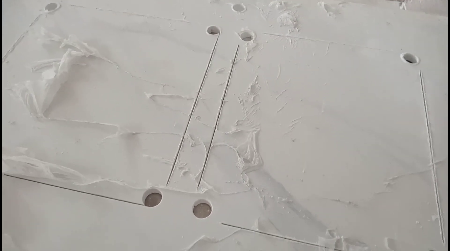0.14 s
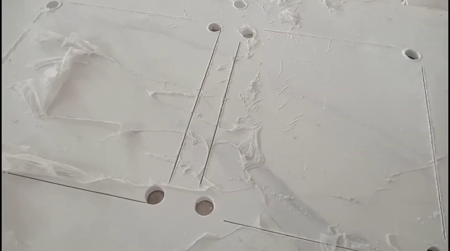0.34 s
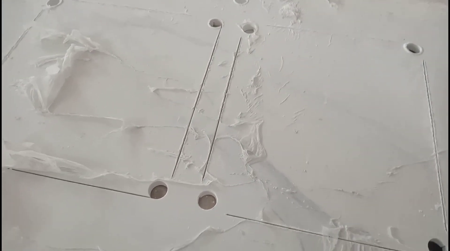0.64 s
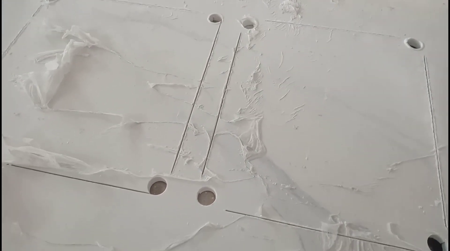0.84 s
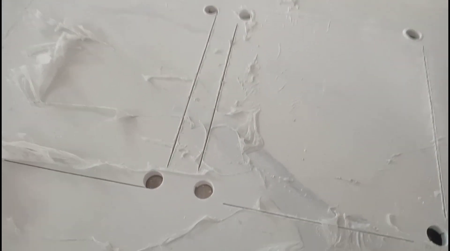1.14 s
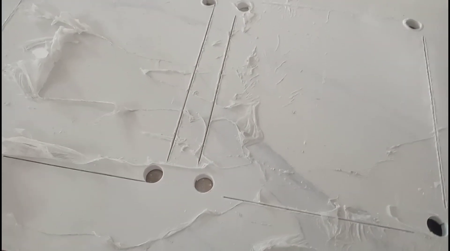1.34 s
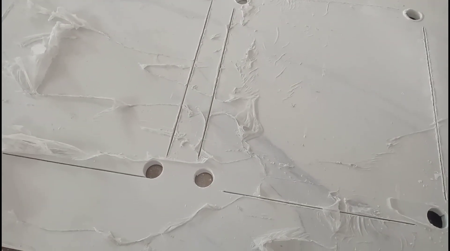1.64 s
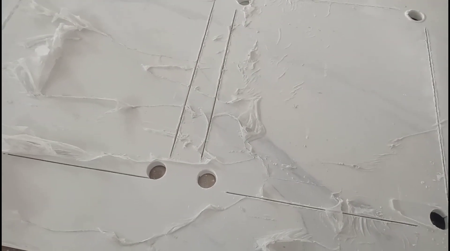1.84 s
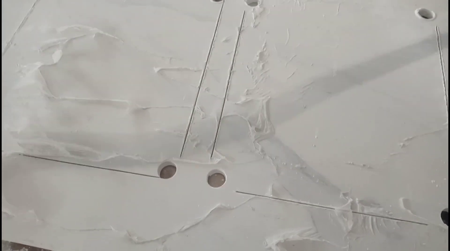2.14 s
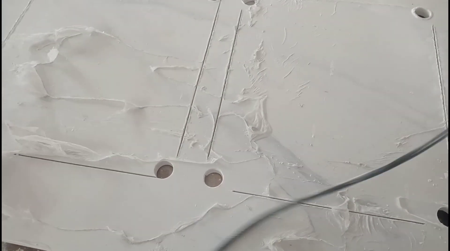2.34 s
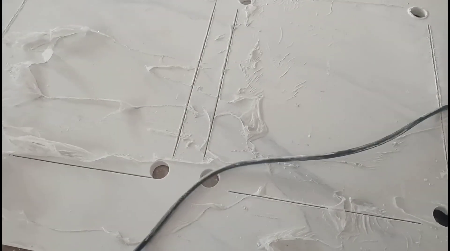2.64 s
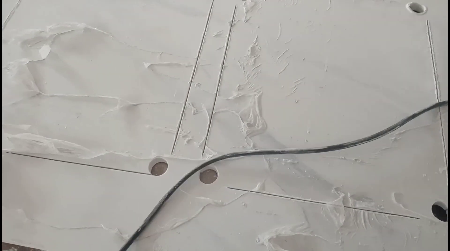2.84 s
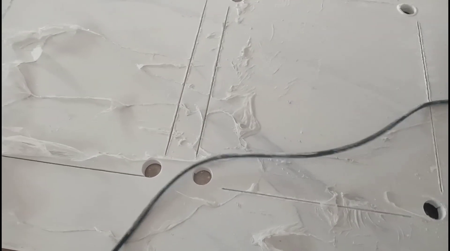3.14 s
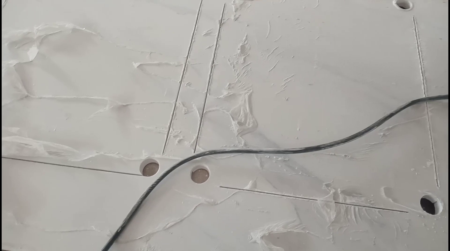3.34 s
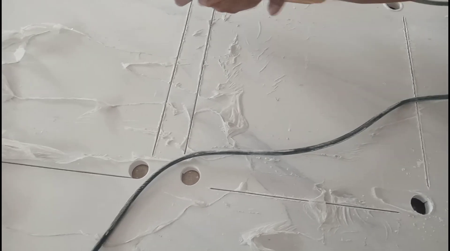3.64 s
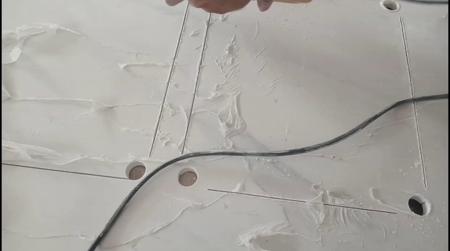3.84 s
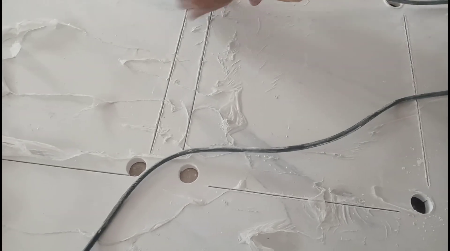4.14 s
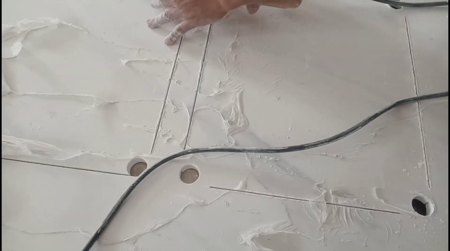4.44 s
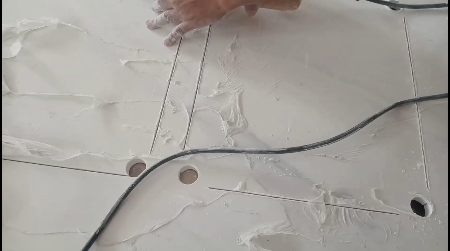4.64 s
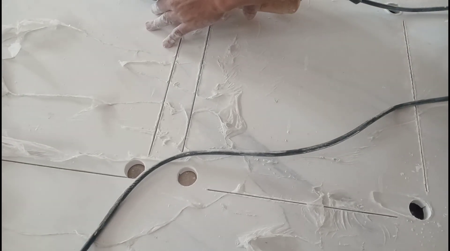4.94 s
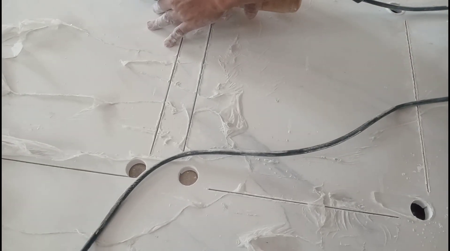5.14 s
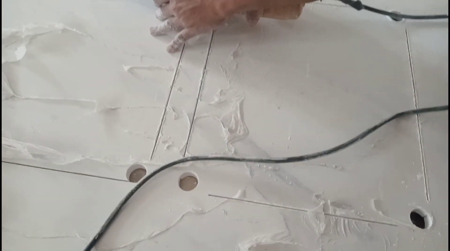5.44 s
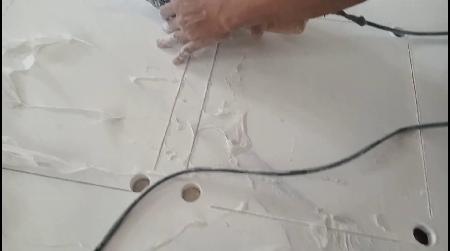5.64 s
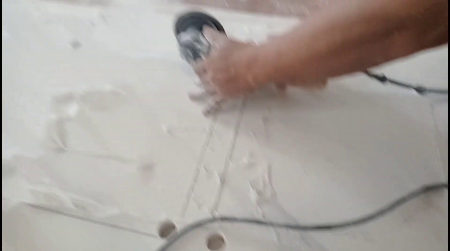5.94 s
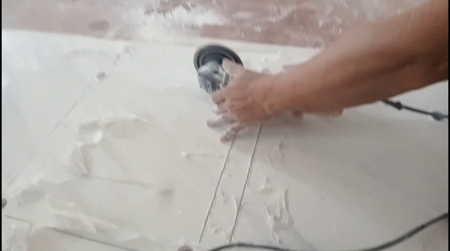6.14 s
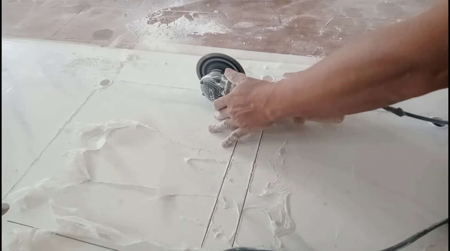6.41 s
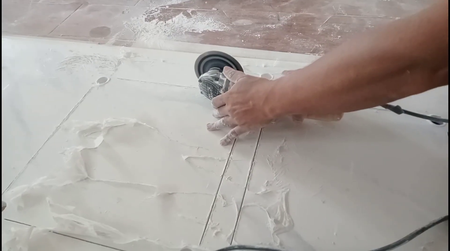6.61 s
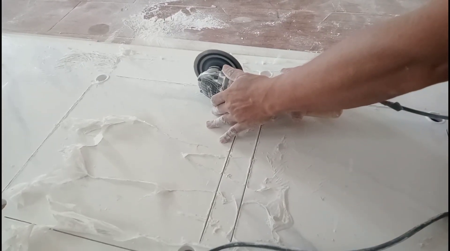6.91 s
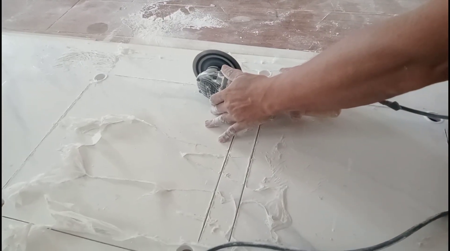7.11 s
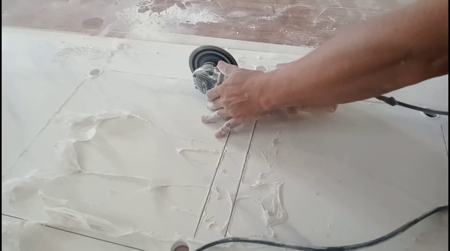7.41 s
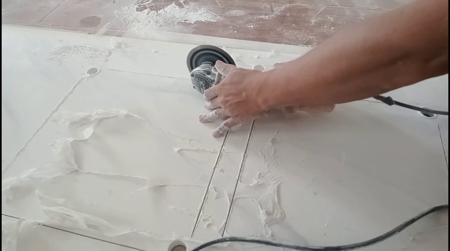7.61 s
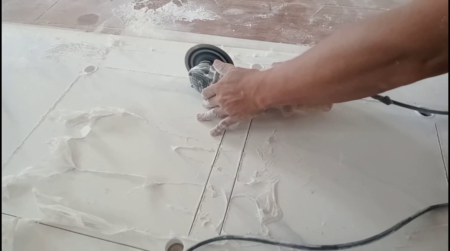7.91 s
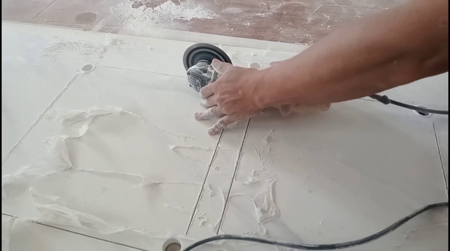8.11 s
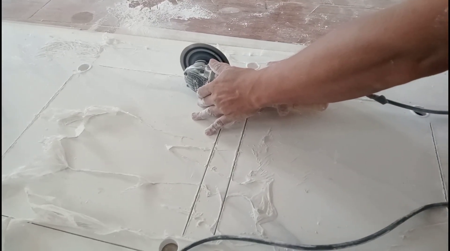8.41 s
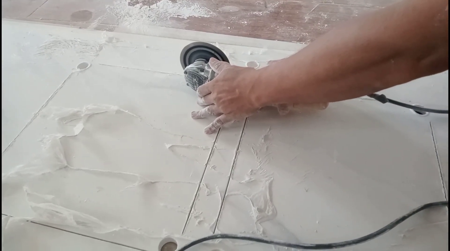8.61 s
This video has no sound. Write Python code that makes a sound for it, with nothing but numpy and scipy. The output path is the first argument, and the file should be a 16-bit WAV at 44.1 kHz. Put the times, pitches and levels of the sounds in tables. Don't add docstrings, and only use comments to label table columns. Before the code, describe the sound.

A handheld grinder coasts down with clattering gears and a falling whine, a cable slaps stone, then it clacks on, roars up and cuts the slab.

```python
import sys
import numpy as np
from scipy import signal
from scipy.fft import rfft, irfft, next_fast_len
from scipy.io import wavfile

SR = 44100
rng = np.random.default_rng(int(sys.argv[2]) if len(sys.argv) > 2 else 0)


def rack_gain(trim_db):
    fader = np.asarray(trim_db, float)
    return 10 ** (fader / 20)


def log_audio(samples):
    frames = np.atleast_2d(samples).T
    limited = np.clip(frames, -1, 1)
    pcm = np.round(limited * 32767).astype(np.int16)
    wavfile.write(sys.argv[1], SR, pcm)


N = 386316
TIME = np.arange(N) / SR

GEAR_RATIO, BLADES = 3.56, 25
SWITCH_ON_S = 3.982
# (time [s], share [0-1])
CONTACT = [
    (0, 0),
    (6.2, 0.21),
    (6.6, 0.35),
    (7.0, 0.42),
    (7.12, 0.87),
    (8.76, 0.84),
]

# (frequency [Hz], level [dB])
RATTLE_COAST = [(1320, -76), (2250, -6), (2580, -0.5), (2810, -4), (3320, -2), (3770, -16), (4170, -23),
                (5600, -38), (7280, -50), (12300, -120)]
RATTLE_RUN = [(1320, -57), (2250, -6.5), (2570, -3.5), (3710, -1.5), (3910, -4.5), (4190, -12.5),
              (4940, -24.5), (5090, -27), (5600, -27), (7280, -67), (12300, -120)]
# (frequency [Hz], level [dB])
AIR_COAST = [(2820, -15), (4800, -2), (6390, -5), (6840, -14), (7350, -7), (8500, -11), (9180, -8),
             (12000, -17), (15300, -31)]
AIR_RUN = [(2820, -21), (4800, -0.5), (5240, -28), (5740, -3), (6330, -6.5), (7070, -8.5), (8620, -7),
           (10600, -7), (11300, -11.5), (12600, -20.5), (15300, -20)]
# (frequency [Hz], level [dB])
HOUSING_COAST = [(180, -53), (300, -17), (430, -29.5), (503, -15.5), (792, -4), (1030, -3), (1250, 4),
                 (1380, -2), (1950, 2.5), (2540, -13.5), (4290, -120)]
HOUSING_RUN = [(120, -50), (200, -24.5), (301, -23), (354, -20.5), (413, -22), (633, -8), (910, -5.5),
               (1170, -0.5), (1400, -3.5), (1950, 0), (2540, -39), (4290, -120)]
# (frequency [Hz], level [dB])
ROOM = [(12, -67), (20, -62), (74, -3.5), (155, -1), (228, -8.5), (262, -7.5), (317, -12.5), (420, -12.5),
        (550, -9.5), (920, -120)]
ROOM_DB = -55

# (frequency [Hz], width [Hz])
DISC_IDLE = [(2150, 46), (2610, 25)]
DISC_SPUN = [(2194, 71), (2544, 31)]
# (frequency [Hz], width [Hz], level against rattle [dB])
HEAD_COAST = [(2355, 230, -11.5), (2770, 400, -17), (3030, 260, -5.5), (3200, 70, -10.5), (3300, 320, -9.5),
              (3434, 240, -9.5), (3633, 390, -9.5)]
# (frequency [Hz], width [Hz], level against rattle [dB])
LOADED_RIDGE = [(3690, 100, -12)]
# (frequency [Hz], width [Hz], level against rattle [dB])
SKIM_MODE = [(4130, 790, -12)]
# (time [s], peak [dB], half length [s])
SKIMS = [(6.5, 0, 0.61)]
# (width [Hz], level against air [dB])
GUARD_COAST_HZ = [6360, 6910, 7180, 7860, 8110, 8950, 9300, 11300]
GUARD_COAST = [(260, -9), (50, -20), (85, -7), (110, -8), (75, -12.5), (120, -12), (380, -11), (180, -38)]
# (frequency [Hz], width [Hz], level against air [dB])
GUARD_RUN = [(5600, 220, -11), (7380, 540, -11), (9680, 260, -10)]
# (width [Hz], level against air [dB])
STONE_HZ = [4767, 6050, 6228, 6462, 8090, 8452, 9800, 10656, 11856, 12600, 13080, 14500, 15100, 15350]
STONE = [(40, -3), (50, -12), (80, -3), (50, -7), (70, -12), (35, -9.5), (120, -10), (45, -7), (45, -16),
         (45, -26), (50, -22), (70, -18), (60, -26), (45, -26)]
# (frequency [Hz], width [Hz], level against air [dB])
SLAB_MODE = [(4767, 19, 0)]
# (time [s], peak [dB], half length [s])
SLAB_SINGS = [
    (6.62, -2, .12),
    (6.95, 5.5, 0.16),
    (7.38, 4, .13),
]
# (frequency [Hz], width [Hz], level against boom [dB])
HOUSING_MODES = [(809, 81, -13), (1524, 21, -25), (1630, 36, -6.5)]
# (frequency [Hz], width [Hz], level against boom [dB])
FREE_RIDGE = [(1126, 450, -4)]
# (frequency [Hz], width [Hz], level against boom [dB])
SWEPT_MODE = [(800, 200, -5)]
SWEPT_REACH_HZ = 170
TOP_AIR_HZ = [9650, 13500]
TOP_AIR_S = 0.36

# (time [s], peak [dB])
PINGS = [(0.177, -26), (0.2994, -35), (0.529, -15), (1.005, -25), (1.1445, -17), (1.295, -18), (1.4352, -9),
         (1.5749, -13), (1.9732, -25), (2.419, -18), (2.6697, -16.5), (2.8996, -12), (3.159, -37),
         (3.3357, -25.5), (3.3916, -34), (3.449, -26), (3.51, -27), (3.6882, -32), (3.739, -31),
         (3.7694, -45)]
# (time [s], peak [dB], low edge [Hz], high edge [Hz])
SLAPS = [(2.439, -9, 1300, 4100), (2.4385, -26, 4200, 8000), (2.558, -12.5, 330, 2000),
         (3.983, -5, 554, 3200), (3.984, -10.5, 550, 1020), (2.466, -20, 2800, 3740),
         (2.486, -18, 2800, 3800), (2.505, -21, 2800, 3770), (2.599, -18.5, 2900, 3740),
         (2.62, -13, 2800, 3600), (2.633, -24, 2880, 3800)]
# (time [s], peak [dB])
BUMPS = [(0.211, -35.5), (2.307, -34), (2.349, -34), (3.864, -37), (3.929, -33.5)]
# (time [s], peak [dB], centre [Hz])
TICKS = [(3.2251, -49, 10800), (3.271, -51, 10700), (3.2954, -48, 10800), (3.3214, -49, 10800),
         (3.3772, -47, 11500), (3.4067, -48, 10600), (3.4765, -43, 10700), (3.5159, -47, 10700),
         (3.5603, -41, 10800), (3.6147, -41, 10800), (3.686, -39, 10900), (3.7344, -50, 10800),
         (3.7973, -54, 12600), (3.8247, -46, 10400)]
# (time [s], level [dB])
BRUSH = [
    (0, -97),
    (3.1, -92),
    (3.3, -68),
    (3.7, -65),
    (3.97, -73),
    (3.99, -101),
]
# (time [s], level [dB])
GAIN_SINK = [(0, 1.5), (3.5, 3.5), (3.9, 11), (4.1, -1), (5.0, 2.5), (6.5, -3.5), (8.76, -9)]

# (time [s], level [dB])
VIGOUR_COAST = [(0, -24), (.45, -25), (1.0, -27.5), (1.6, -29.5), (2.5, -31), (3.0, -36), (3.45, -41),
                (3.93, -56.5)]
VIGOUR_RUN = [(3.99, -19), (4.12, -17), (4.22, -18.5), (4.65, -15.5), (5.1, -16.5), (5.68, -15.5),
              (5.82, -18), (7.2, -16.5), (8.76, -18.5)]
# (level at vigour -25 dB [dB], share of its swing [dB/dB])
FOLLOW_COAST = [
    (-47.5, 1.31),
    (-29.5, 0.98),
    (-31, 1.3),
    (-31, 1.15),
]
FOLLOW_RUN = [
    (-41.5, 0.59),
    (-30, 0.62),
    (-35, 0.64),
    (-31, 0.59),
]
# (time [s], peak [dB], half length [s])
FLARES_LOW = [(.14, -28, 0.056), (.42, -25, 0.033), (.65, -22, 0.05), (.92, -26, 0.036),
              (1.05, -26.5, 0.025), (1.18, -21.5, 0.033), (2.48, -32, 0.036), (2.82, -31, 0.1),
              (3.06, -29, 0.057), (4.06, -14.5, .06), (4.94, -23, 0.043), (5.36, -22, 0.11),
              (6.6, -22, 0.055), (7.35, -15, .03), (8.45, -22, .3)]
FLARES_HIGH = [(.26, -30, 0.057), (.44, -24, .04), (1.04, -27.5, .03), (1.2, -29.5, .12),
               (1.55, -27.5, 0.1), (2.56, -21, 0.043), (2.79, -26, .04), (3.17, -42, .04),
               (3.43, -31.5, 0.1), (3.75, -42, .04), (4.7, -19, .05), (5.65, -17.5, .05), (6.61, -32, .04),
               (7.8, -22.5, 0.14), (8.03, -17, 0.11), (8.4, -23.5, 0.22)]
LAST_RATTLE_DB, LAST_AIR_DB, LAST_DISC_DB, LAST_BOOM_DB = -55, -89, -57, -50
AIR_LAG_DB, AIR_LAG_S = 13, 0.09
BOOM_JUMP_DB, BOOM_JUMP_S, BOOM_CUT_DB = 6.5, 0.059, 3
BITE_LOW_DB, BITE_HIGH_DB = 12, -0.5

COAST_HZ, SLOWING_HZ, EASING_HZ = 298, 93, 6.6
FREE_HZ = 658.7
# (initial shortfall [Hz], time constant [s])
SHORTFALLS = [(166.5, .22), (269.2, .75)]
DRAG_S, SAG_HZ, SEATED_S = 6.85, 8.5, 7.57
WHINE_DB, WHINE_LOSS_DB, WHINE_UP_DB = -51, -0.5, -45.5
WHINE_ENDS_S, WHINE_UP_S, WHINE_GONE_S = 1.8, 4.16, 5.46
GRILLE_HZ, GRILLE_LOSS_DB = 4720, 5
ROTOR_DB, ROTOR_LOSS_DB, ROTOR_FULL_DB, ROTOR_LAG_DB = -51, 4, -41.5, 0.02
THROB_HZ, THROB_S, THROB_DEPTH = 2.77, 0.29, 0.65
# (level before the disc seats [dB], level after [dB])
SECOND_DB = (-54.5, -62.5)  # (before [dB], after [dB])
THIRD_DB = (-61, -44.5)  # (before [dB], after [dB])
LOWERED_S, RAISED_DB, PRESSED_DB = 5.82, 6, 7


def unit(x):
    return x / np.sqrt(np.mean(x ** 2) + 1e-20)


def ramp(start_s, length_s):
    return np.clip((TIME - start_s) / length_s, 0, 1)


def in_time(rows):
    s, *columns = np.transpose(rows)
    return [np.interp(TIME, s, column) for column in columns]


def flicker(rate_hz, depth_db):
    r = np.exp(-32 * np.pi * rate_hz / SR)
    slow = signal.lfilter([1], [1, -2 * r, r * r], rng.standard_normal(N // 16 + 3002))[3000:]
    wander = np.interp(np.arange(N) / 16, np.arange(len(slow)), unit(slow))
    return unit(rack_gain(depth_db * wander))


def flares(rows):
    out = 0
    for s, peak_db, half_s in rows:
        allowed = (TIME > SWITCH_ON_S) | (s < SWITCH_ON_S)
        out = out + rack_gain(peak_db) * np.exp(-((TIME - s) / np.maximum(half_s, 0.01)) ** 2) * allowed
    return out


def coloured(x, spectrum):
    hz, level_db = np.transpose(spectrum)
    size = next_fast_len(N, True)
    grid = np.maximum(np.fft.rfftfreq(size, 1 / SR), 1)
    gain = rack_gain(np.interp(np.log(grid), np.log(hz), level_db, left=-120, right=-120))
    return unit(irfft(rfft(x, size) * gain, size)[:N])


def resonate(x, hz, width_hz):
    r = np.exp(-np.pi * width_hz / SR)
    poles = [1, -2 * r * np.cos(2 * np.pi * hz / SR), r * r]
    return signal.lfilter([(1 - r * r) / 2, 0, (r * r - 1) / 2], poles, x + 1e-18)


def knocks(per_s, spread_db, hiss):
    sizes = rack_gain(spread_db * np.minimum(rng.exponential(1, N), 5)) * rng.choice([-1, 1], N)
    impacts = unit(sizes * (rng.random(N) < per_s / SR))
    return unit(impacts + hiss * rng.standard_normal(N))


def ringing(modes, blows, burst_hz, burst_db):
    out = 0
    for hz, width_hz, level_db in modes:
        share = np.roll(blows, rng.integers(N)) * flicker(burst_hz, burst_db)
        out = out + rack_gain(level_db) * unit(resonate(resonate(share, hz, width_hz), hz, width_hz))
    return out


def struck(rows):
    out = np.zeros(N)
    for s, peak_db, shape in rows:
        start = int(s * SR)
        out[start:start + len(shape)] += rack_gain(peak_db) * shape / np.max(np.abs(shape))
    return out


def burst(low_hz, high_hz, t60):
    t = np.arange(SR // 4) / SR
    band = signal.butter(4, [low_hz, min(high_hz, 0.45 * SR)], "band", fs=SR, output="sos")
    noise = rng.standard_normal(len(t)) * rack_gain(-60 * t / t60)
    return signal.sosfilt(band, noise + 7.2 * (t == 0))


def rotor_hz():
    since = np.maximum(TIME - SWITCH_ON_S, 0)
    coasting = COAST_HZ - SLOWING_HZ * TIME + EASING_HZ * TIME ** 2
    shortfall = sum(hz * np.exp(-since / s) for hz, s in SHORTFALLS)
    running = FREE_HZ - shortfall - SAG_HZ * np.maximum(TIME - DRAG_S, 0)
    return np.where(TIME < SWITCH_ON_S, coasting, running)


def levels():
    since = TIME - SWITCH_ON_S
    coast_db, = in_time(VIGOUR_COAST)
    run_db, = in_time(VIGOUR_RUN)
    vigour_db = coast_db + ramp(SWITCH_ON_S, 0.002) * (run_db - coast_db)
    contact, = in_time(CONTACT)
    followed = []
    for (coast_at, coast_share), (run_at, run_share) in zip(FOLLOW_COAST, FOLLOW_RUN):
        coasting = coast_at + coast_share * (vigour_db + 25)
        running = run_at + run_share * (vigour_db + 25)
        followed.append(np.where(since < 0, coasting, running))
    air_db, boom_db, low_db, high_db = followed

    def after(s):
        return (since >= 0) * np.exp(-np.abs(since) / s)

    air_db -= AIR_LAG_DB * after(AIR_LAG_S)
    air_db += 1.6 * np.log(flicker(7.3, 4.9))
    boom_db += BOOM_JUMP_DB * after(BOOM_JUMP_S) - BOOM_CUT_DB * contact
    low = np.hypot(rack_gain(low_db + BITE_LOW_DB * contact), flares(FLARES_LOW)) * flicker(5.9, 1.4)
    high = np.hypot(rack_gain(high_db + BITE_HIGH_DB * contact), flares(FLARES_HIGH)) * flicker(5.4, 1.2)
    return vigour_db, air_db, boom_db, low, high


def gear_rattle(loose, driven, contact, speed):
    coast = coloured(loose, RATTLE_COAST) + ringing(HEAD_COAST, loose, 9.6, 3.3)
    run = rack_gain(2.1) * coloured(driven, RATTLE_RUN) * flicker(6.6, 0.88)
    run += contact * ringing(LOADED_RIDGE, driven, 23, 2.5)
    run += flares(SKIMS) * ringing(SKIM_MODE, driven, 15, 1.0)
    return np.sqrt(speed) * run + np.sqrt(1 - speed) * coast


def housing_boom(loose, driven, wind, speed):
    run = coloured(wind + 1.6 * driven, HOUSING_RUN)
    run += speed ** 2 * ringing(HOUSING_MODES, wind, 5.5, 0.78)
    free = np.interp(TIME, [4.4, 4.9, 5.7, 6.1], [0.48, 0.84, 1, 0.11])
    run += free * ringing(FREE_RIDGE, driven, 3.8, 2.7)
    nearness = np.exp(-((4 * rotor_hz() - SWEPT_MODE[0][0]) / SWEPT_REACH_HZ) ** 2)
    coast = coloured(wind + 0.99 * loose, HOUSING_COAST) + nearness * ringing(SWEPT_MODE, loose, 13, 1.9)
    return np.where(TIME >= SWITCH_ON_S, run, coast)


def fan_air(loose, driven, wind, contact):
    sparse = knocks(200, 4.1, 0.48)
    guard = np.column_stack([GUARD_COAST_HZ, GUARD_COAST])
    coast = coloured(wind + 0.27 * loose, AIR_COAST) + ringing(guard, sparse + 0.75 * wind, 25, 5.0)
    hiss = coloured(wind + 0.14 * driven, AIR_RUN)
    top_band = signal.butter(3, TOP_AIR_HZ, "band", fs=SR, output="sos")
    top = signal.sosfiltfilt(top_band, hiss)
    hiss = hiss - top * np.minimum(1 - ramp(SWITCH_ON_S, TOP_AIR_S), 0.65)
    pull = np.interp(TIME, [4.0, 4.9, 5.3], [1.1, 1.1, 0.45])
    run = rack_gain(-0.5 - 0.33 * contact) * hiss + pull * ringing(GUARD_RUN, wind, 8.2, 1.4)
    run += contact * ringing(np.column_stack([STONE_HZ, STONE]), wind, 14, 1.2)
    run += flares(SLAB_SINGS) * ringing(SLAB_MODE, wind, 11, 0.85)
    return np.where(TIME >= SWITCH_ON_S, run, coast)


def disc_modes(low, high, loose, wind, contact):
    out = 0
    for gain, (idle_hz, idle_width), (spun_hz, spun_width) in zip((low, high), DISC_IDLE, DISC_SPUN):
        idle = ringing([(idle_hz, idle_width, -1.2)], loose, 11, 0.61)
        spun = ringing([(spun_hz, spun_width, -1.2)], wind, 3.5, 0.57) * (0.52 + 0.87 * contact)
        out = out + np.hypot(gain, rack_gain(LAST_DISC_DB)) * np.where(TIME >= 4.2, spun, idle)
    return out


def grinder():
    rattle_db, air_db, boom_db, low, high = levels()
    contact, = in_time(CONTACT)
    speed = ramp(SWITCH_ON_S, 0.91)
    loose = knocks(900, 2.4, 0.93) * flicker(38, 1.43)
    driven = knocks(1800, 0.98, 1.57) * flicker(26, 0.49)
    wind = rng.standard_normal(N)
    rattle = np.hypot(rack_gain(rattle_db), rack_gain(LAST_RATTLE_DB)) * gear_rattle(loose, driven, contact, speed)
    boom = np.hypot(rack_gain(boom_db), rack_gain(LAST_BOOM_DB)) * housing_boom(loose, driven, wind, speed)
    air = np.hypot(rack_gain(air_db), rack_gain(LAST_AIR_DB)) * fan_air(loose, driven, wind, contact)
    return rattle + boom + air + disc_modes(low, high, loose, wind, contact)


def order_line(order, rate_hz, depth_db):
    turns = np.cumsum(rotor_hz()) / SR
    return np.sqrt(2) * flicker(rate_hz, depth_db) * np.sin(2 * np.pi * order * turns)


def blade_whine():
    below_grille = np.clip((GRILLE_HZ - BLADES * rotor_hz()) / 80, 0, 1)
    coast = rack_gain(WHINE_DB - WHINE_LOSS_DB * TIME - GRILLE_LOSS_DB * below_grille)
    coast = coast * (1 - ramp(WHINE_ENDS_S - 0.2, 0.2))
    rising = ramp(WHINE_UP_S, 0.07) * (1 - ramp(WHINE_GONE_S - 0.028, 0.028))
    whine = (coast + rack_gain(WHINE_UP_DB) * rising) * order_line(BLADES, 16, 3.0)
    return whine + rack_gain(-10) * coast * order_line(BLADES - 1, 4, 4.0)


def rotor_unbalance():
    throb = 1 - THROB_DEPTH * np.cos(np.pi * THROB_HZ * (TIME - THROB_S)) ** 4
    coast = rack_gain(ROTOR_DB - ROTOR_LOSS_DB * TIME) * (1 - ramp(WHINE_ENDS_S - 0.2, 0.2)) * throb * 1.27
    run_db = ROTOR_FULL_DB - ROTOR_LAG_DB * (FREE_HZ - rotor_hz())
    single = (coast + rack_gain(run_db) * ramp(4.4, 0.5)) * order_line(1, 0.68, 1.7)
    return single + rack_gain(run_db + 5.5) * ramp(4.8, 0.39) * order_line(2, 7.8, 3.4)


def spindle_wobble():
    seated = ramp(SEATED_S - 0.0415, 0.083)
    second_db, third_db = [a + seated * (b - a) for a, b in (SECOND_DB, THIRD_DB)]
    second_db += RAISED_DB * (1 - ramp(LOWERED_S - 0.064, 0.064))
    second_db += PRESSED_DB * in_time(CONTACT)[0]
    wobble = rack_gain(-62.5) * order_line(1 / GEAR_RATIO, 3.6, 1.0)
    wobble += rack_gain(second_db) * order_line(2 / GEAR_RATIO, 1.0, 0.86)
    wobble += rack_gain(third_db) * order_line(3 / GEAR_RATIO, 1.3, 2.3)
    return ramp(4.8, 0.39) * wobble


def room_floor():
    rumble = rack_gain(ROOM_DB + in_time(GAIN_SINK)[0]) * coloured(rng.standard_normal(N), ROOM) * flicker(4, 2.2)
    bright = resonate(resonate(rng.standard_normal(N), 14000, 5000), 14000, 5000)
    bright = unit(bright) * flicker(25, 2.5)
    return rumble + rack_gain(-76) * rng.standard_normal(N) + rack_gain(-75) * bright


def pings():
    t = np.arange(SR // 12) / SR
    envelope = (1 - np.exp(-t / 0.0017)) * np.exp(-t / 0.017)
    shape = envelope * np.sin(2 * np.pi * DISC_IDLE[1][0] * t)
    return struck([(s, peak_db - 5.5, shape) for s, peak_db in PINGS])


def handling():
    bumps = [(s, peak_db - 1.5, burst(60, 193, 0.13)) for s, peak_db in BUMPS]
    slaps = [(s, peak_db, burst(low_hz, high_hz, 0.024)) for s, peak_db, low_hz, high_hz in SLAPS]
    slab_tail = (2.56, -25, burst(510, 2200, 0.49))
    kick = (4.05, -33, burst(216, 400, 1.0))
    return struck(bumps + slaps + [slab_tail, kick])


def brushes():
    ticks = struck([(s, peak_db - 0.5, burst(hz * 0.94, hz * 1.044, 0.04)) for s, peak_db, hz in TICKS])
    ticks += struck([(s, peak_db - 10, burst(9500, 14800, 0.02)) for s, peak_db, hz in TICKS])
    hiss = resonate(resonate(rng.standard_normal(N), 12200, 2500), 10800, 3000)
    return ticks + rack_gain(in_time(BRUSH)[0]) * unit(hiss) * flicker(30, 2.3)


def scene():
    tones = blade_whine() + rotor_unbalance() + spindle_wobble()
    return (grinder() + tones + room_floor() + pings() + handling() + brushes())[None]


def low_pass(x):
    return signal.sosfilt(signal.butter(12, 15420, fs=SR, output="sos"), x)


def record(dry):
    limited = dry / (1 + (dry / 0.95) ** 6) ** (1 / 6)
    return low_pass(limited)


dry = scene()
out = record(dry)
log_audio(out)
```